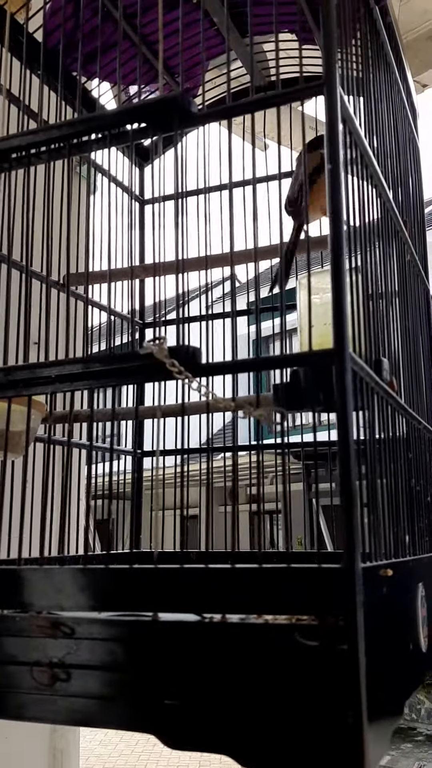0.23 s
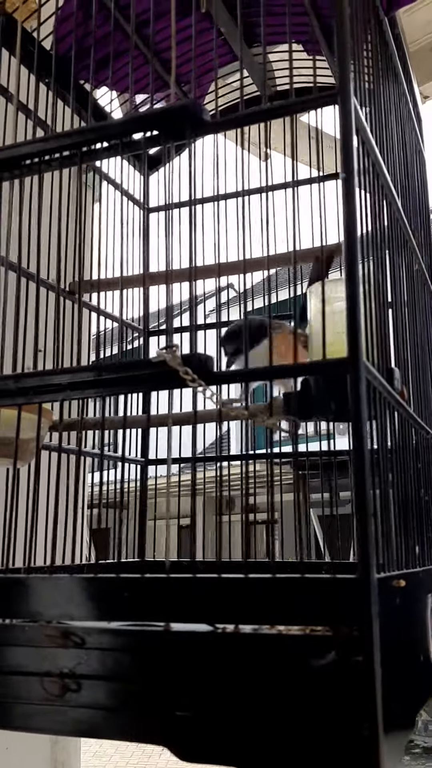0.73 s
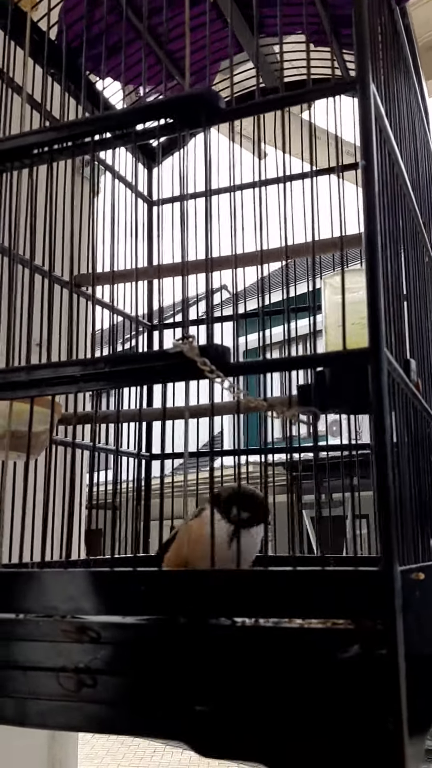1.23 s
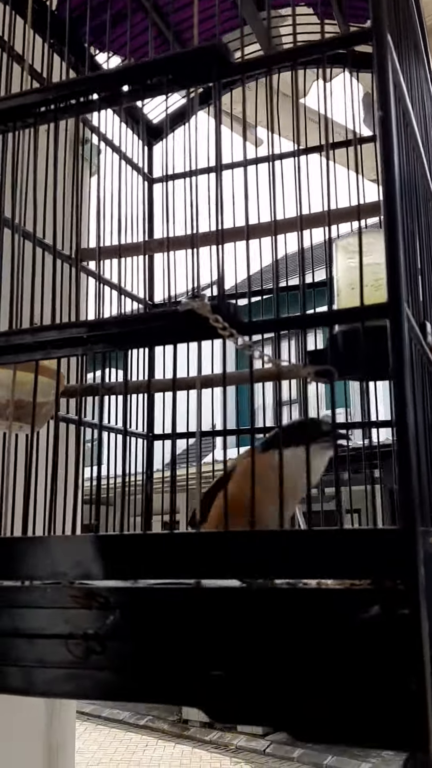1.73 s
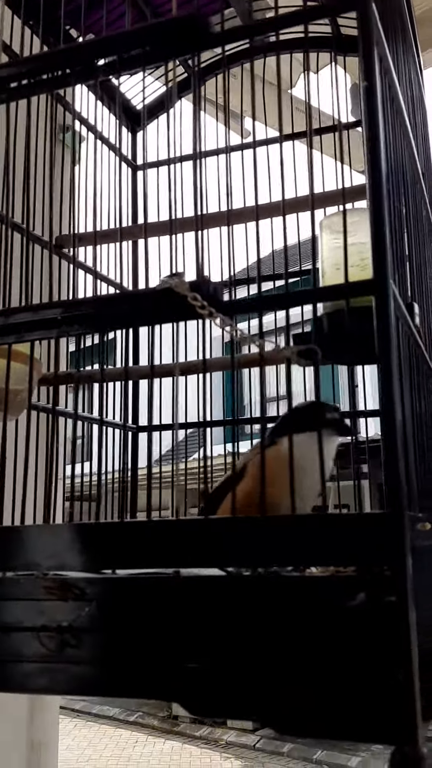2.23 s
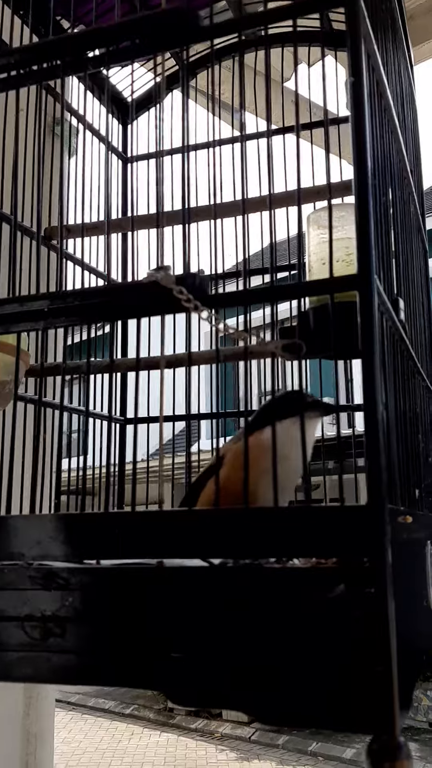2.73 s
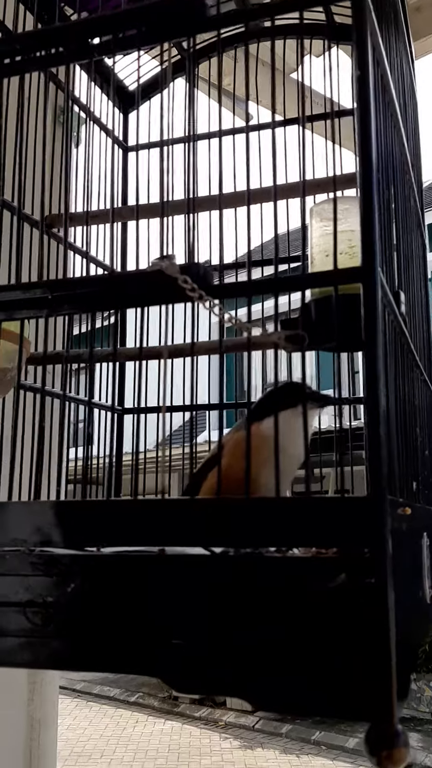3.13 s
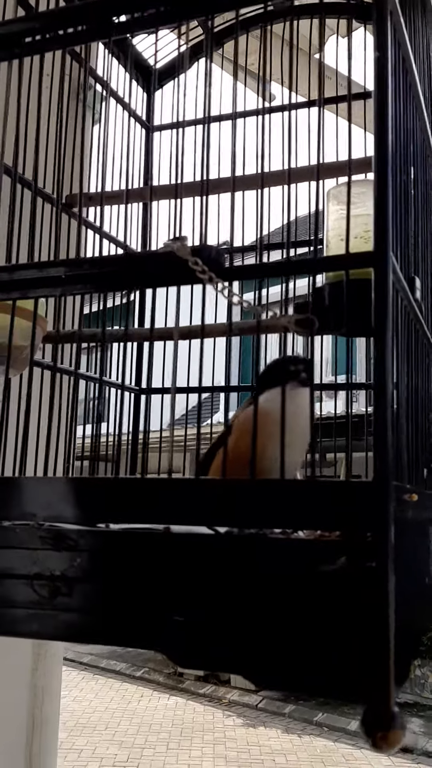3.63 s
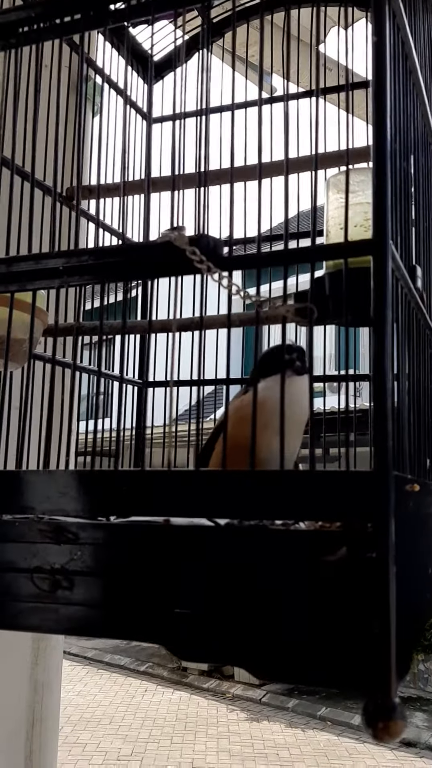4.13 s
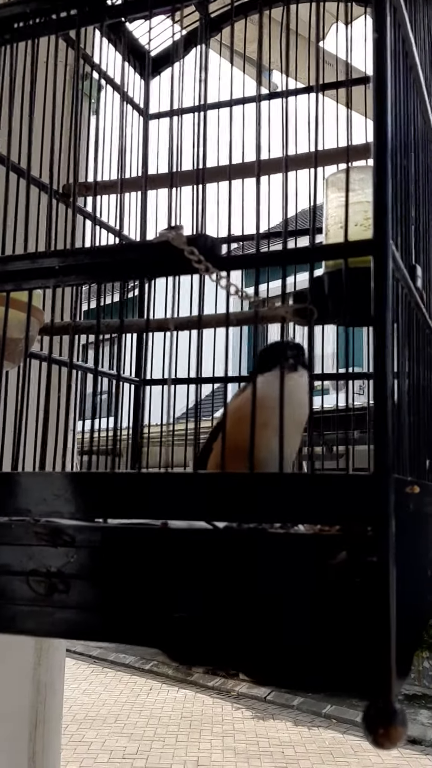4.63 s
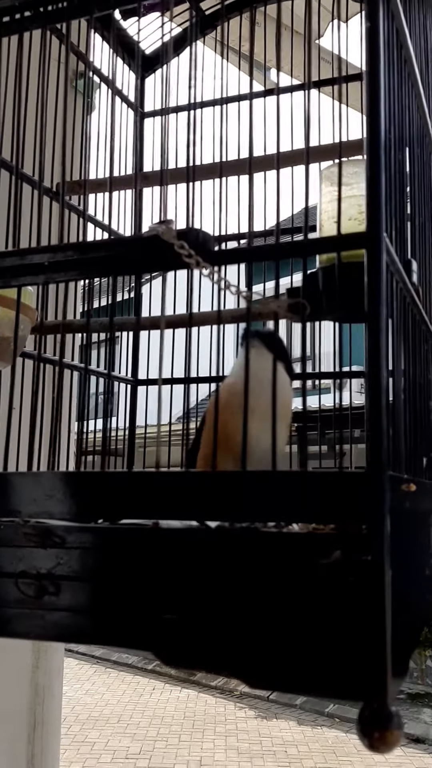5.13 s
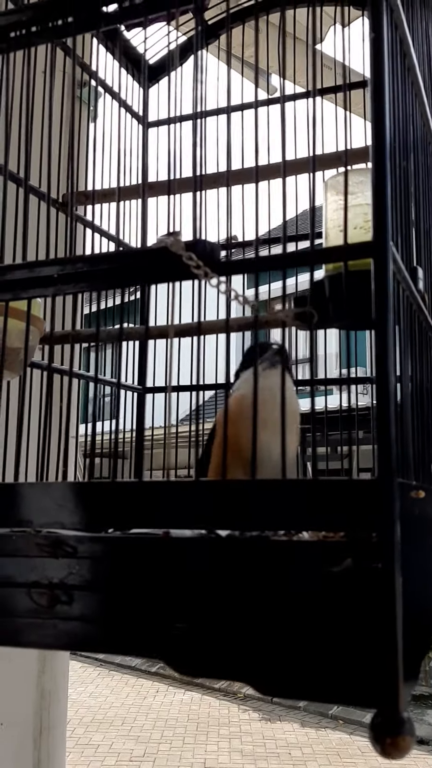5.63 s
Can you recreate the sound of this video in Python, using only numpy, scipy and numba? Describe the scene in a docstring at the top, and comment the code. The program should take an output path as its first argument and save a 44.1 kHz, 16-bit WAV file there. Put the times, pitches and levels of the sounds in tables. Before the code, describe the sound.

A caged bird flutters down with hoarse rasps, then gives evenly spaced sharp chips that turn into lower nasal yips in a ringing porch.

```python
"""Shrike in a porch cage

A shrike flutters down to the floor of a wire cage, with three hoarse rasps, a run of sharp chips, then nasal yips.
Each note is a stack of partials on one quick arch of pitch, shaped by throat and beak; the porch rings after it.
Wing strokes are puffs of low noise; claws are ringing knocks on the frame with noisy ticks on the wires.
A second bird twitters further off, over a noise bed of low town rumble and blurred birds and echoes above,
with a faint hum and one soft low note. All is heard through a phone with two ports and a limiter, held at the bars."""
import sys
import numpy as np
from scipy import signal
from scipy.fft import rfft, irfft
from scipy.io import wavfile
from scipy.ndimage import map_coordinates
from numba import njit

SR = 44100
rng = np.random.default_rng(int(sys.argv[2]) if len(sys.argv) > 2 else 0)


def wrap_up_sound(samples):
    """Save the sound to the file named by the first command line argument, as 16-bit audio."""
    columns = np.atleast_2d(samples).T
    # keep every value between -1 and 1, then stretch to whole-number steps
    tamed = np.clip(columns, -1, 1)
    steps = np.round(tamed * 32767).astype(np.int16)
    wavfile.write(sys.argv[1], SR, steps)


N = 259294  # length in samples

# Levels are mix settings ahead of resonance, reverberation and limiter.
# Hoarse calls: start_s, length_s, top_hz, level_db, beak_hz, brightness_db_per_octave
RASP_NOTES = [(.189, 0.055, 2140, -30, 3360, -4.5), (.938, .06, 2053, -26, 3330, 2.5),
              (1.529, .056, 2407, -23.5, 3520, -3)]
# Sharp falling chips: start_s, length_s, top_hz, level_db, beak_hz, beak_gain_db,
# brightness_db_per_octave, roughness (0 = clean)
CHIP_NOTES = [(1.2868, .021, 2306, -19.5, 4500, 4, -5.5, 0.17),
              (1.8033, .019, 2410, -20.5, 4100, 6.5, 4.5, 0.13),
              (2.0783, 0.018, 2443, -19.5, 4100, 7, 4.5, 0),
              (2.3957, 0.019, 2408, -21.5, 4480, 11.5, 3, 0.14),
              (2.7204, 0.018, 2412, -22.5, 4100, 11.5, 5, 0),
              (3.0205, 0.019, 2314, -22.5, 4400, 14, 4, 0.25),
              (3.3366, 0.021, 2416, -24, 4160, 12.5, 5.5, .1),
              (3.6262, .024, 2054, -23, 5070, 13.5, 7.5, 0.2)]
# Lower, nasal yips: start_s, length_s, top_hz, level_db, beak_hz, brightness_db_per_octave,
# start_pitch (share of the top)
YIP_NOTES = [(3.9138, 0.024, 1542, -25, 4580, 1, 0.88), (4.2372, 0.023, 1481, -27.5, 4540, 0.5, 0.8),
             (4.591, 0.027, 1509, -26.5, 4580, -1.5, 0.84), (4.8565, 0.038, 1609, -26, 4220, -1.5, .68),
             (5.1165, 0.035, 1627, -25, 3840, -8.5, .68), (5.4052, .034, 1513, -25.5, 4050, -2, .78),
             (5.6718, 0.03, 1434, -26, 4520, -1.5, 0.82)]
# Throat colour of both birds: partial_hz, gain_db
THROAT_COLOUR = [(1000, -5), (1400, -5.5), (1800, -1), (2300, -1), (3000, 3.5), (4000, 2.5), (5200, 2.5),
                 (6500, -2), (8300, -11), (9700, -8.5), (12000, -15), (16000, -25)]
# Shrike's place between the ports: time_s, left_minus_right_db
SHRIKE_PLACE = [(0, 2), (1.8, -3.5), (3.3, 1), (4.3, 1), (5.8, 0)]
# Claws on the cage: start_s, knock_db, wire_tick_db
CLAW_HITS = [(.768, -43, -48), (1.071, -49, -43), (1.089, -34.5, -42), (1.113, -32, -37), (1.22, -53, -44),
             (1.791, -35, -50)]
# Ringing modes of the cage frame: mode_hz, level_db, t60_s
CAGE_MODES = [(466, -21, 0.85), (564, -21, 0.075), (786, -4, 0.035), (933, -4.5, 0.017), (1143, -13, 0.12)]
# Flurries of wing strokes: start_s, length_s, first_stroke_db
WING_FLURRIES = [(.553, .17, -26.5), (.772, .12, -25), (1.155, .03, -38)]
WINGBEAT_HZ, STROKE_S, STROKE_FADE_DB_PER_S = 20.25, .048, 61
# Phase by which the left port leads: frequency_hz, lead_radians
PORT_LEAD = [(0, 0), (950, 1.1), (2070, -0.1), (2840, 2.0), (3530, 2.9), (3960, 5.5), (5770, 8.6),
             (7840, 7.7), (8790, 9.0), (11000, 9.9), (13000, 12.3), (14500, 10.6), (15300, 12.1),
             (16500, 12.5)]
# Strength at the two ports: frequency_hz, left_minus_right_db
PORT_LEVELS = [(1300, -.5), (2400, -1), (4400, -.3), (8000, -2.5), (15000, -3)]
# Porch reverberation by band: centre_hz, level_db, t60_s (before the tail is stretched)
PORCH_TAIL = [(1170, -5.5, 0.61), (2220, -9, 0.49), (3130, -11, 0.49), (4400, -9, 0.53), (7000, -9.5, .45),
              (9600, -14, 0.44), (14800, -7, 0.37)]
# Notes of the far bird; the first is the rough, fading tail of an earlier call: start_s, length_s,
# top_hz, level_db, brightness_db_per_octave, roughness (0 = clean), summit_place (share of the length)
TWITTER_CALLS = [(0, 0.014, 1870, -53.5, 4, 1.1, .1), (.513, 0.028, 2492, -54, 7.5, 0.54, .15),
                 (.55, 0.045, 2230, -49.5, 3.5, 0.53, 0.12), (.604, 0.039, 3664, -46, 1, 0.94, 0.86),
                 (3.838, 0.05, 2635, -54.5, 3, 1, .3), (3.88, 0.098, 3460, -48, 3.5, 0.73, 0.44),
                 (3.95, .086, 4390, -45.5, -3, 0.97, 0.3), (5.046, .036, 3100, -49, 2.5, 0.2, 0.5),
                 (5.1, 0.06, 4150, -43.5, 2, 0.56, 0.19), (5.145, .04, 3634, -39, -7, 0.18, .7)]
# Spectrum of the outdoor background, relative: frequency_hz, density_db (per Hz)
TOWN_SPECTRUM = [(15, -44), (25, 1.5), (137, 0), (489, -17.5), (1070, -21), (1520, -24.5), (1840, -23.5),
                 (3340, -28), (4370, -23), (5140, -25), (6920, -30), (8590, -41), (9320, -39.5),
                 (14000, -41), (16000, -63)]
# Swell of the background, eased off towards the treble: time_s, swell_db
TOWN_SWELL = [(0, 3), (.4, 4), (1.1, 6), (1.8, 3.5), (2.6, 1), (3.3, 0.5), (5.8, 0)]
TOWN_DB = -43  # rms over both sides
TOP_HZ = 15900  # upper edge of the phone's range


def shrike_song():
    """The shrike's rasps, chips and yips; the first chip comes before the last rasp."""
    return sing(RASP_NOTES, rasp) + sing(CHIP_NOTES, chip) + sing(YIP_NOTES, yip)


def rasp(length, top_hz, db, beak_hz, bright_db):
    """A hoarse swell up from a low growl, its roughness clearing as the note goes on."""
    return note(length, top_hz, db, beak_hz, bright_db, start=0.24, end=.6, summit=.48,
                attack=0.43, fading=0.29, beak_db=5.5, rough=0.82, clearing=1, half_db=-10,
                closing_db=23.5, crest_db=3.5, jitter=0.04, air=0.35)


def chip(length, top_hz, db, beak_hz, beak_db, bright_db, rough):
    """A note that starts near its top and drops by over an octave."""
    return note(length, top_hz, db, beak_hz, bright_db, start=0.94, end=0.46, summit=0.1687,
                attack=.26, fading=0.72, beak_db=beak_db, rough=rough, half_db=-9.5,
                closing_db=8.5, crest_db=4, fall=1.5, jitter=0.033, beak_width_hz=880)


def yip(length, top_hz, db, beak_hz, bright_db, start):
    """A shallow arch with an abrupt start, pushed hardest at its summit."""
    return note(length, top_hz, db, beak_hz, bright_db, start=start, end=.8, summit=.48,
                attack=0.12, fading=0.55, beak_db=12.5, rough=0.057, closing_db=25,
                crest_db=5.0, rise=1.094, fall=1.55, beak_width_hz=583)


def sing(notes, voice):
    """Place all the sounds of one kind on a track."""
    out = np.zeros(N)
    for start_s, *settings in notes:
        add(out, start_s, voice(*settings))
    return out


def note(length, top_hz, db, beak_hz, bright_db, rough, *, start, end, summit, attack, fading,
         beak_db, closing_db, crest_db, clearing=0, half_db=-np.inf,
         sheen_db=0, sheen_hz=11800, sheen_width_hz=800, rise=1.3, fall=1.3, beak_width_hz=778,
         closing_octaves=0.64, jitter=0.054, flutter=.45, air=0.49, crest_s=0.0051):
    """One arch of the syrinx: partials through throat and beak, whose resonance sinks as the beak closes."""
    # start and end are shares of the top pitch; summit, attack and fading are shares of the length
    t = np.arange(int(length * SR)) / SR
    done = t / length
    top_s = summit * length
    rough = rough * (1 - min(clearing, 1) * done)

    to_summit = np.clip(1 - t / top_s, 0, 1) ** rise
    past_summit = np.clip((t - top_s) / max(length - top_s, 1 / SR), 0, 1) ** fall
    hz = top_hz + (start - 1) * top_hz * to_summit + (end - 1) * top_hz * past_summit
    hz = hz * (1 + jitter * rough * walk(len(t), 690))  # the membranes swing unevenly
    orders = np.arange(1, 14.5, .5)[:, None]
    partials = orders * hz

    resonance_hz = beak_hz * 2 ** (closing_octaves * (.5 - done))
    colour_db = at_hz(partials, THROAT_COLOUR)
    colour_db += beak_db / (1 + ((partials - resonance_hz) / beak_width_hz) ** 2)
    tilt_db = bright_db + closing_db * (.5 - done)  # per octave, above the beak only
    colour_db += tilt_db * np.log2(np.maximum(partials / beak_hz, 1))
    # a thin, high resonance
    colour_db += sheen_db / (1 + ((partials - sheen_hz) / sheen_width_hz) ** 2)
    # strong and weak swings alternate: lines between the harmonics
    colour_db += np.where(orders % 1, half_db, 0)

    phase = 2 * np.pi * np.cumsum(partials, axis=1) / SR
    grit = np.array([walk(len(t), 1786) for _ in partials])  # air rasps on every partial
    waves = np.sin(phase) + air * rough * grit * np.cos(phase)
    tone = np.sum(undb(colour_db) * (partials < SR / 2.5) * waves, axis=0)

    pressure = np.sin(np.pi / 2 * np.clip(done / attack, 0, 1)) ** 2
    pressure *= np.clip((1 - done) / max(fading, 1 / len(t)), 0, 1) ** 0.63
    # the push peaks with the pitch
    pressure *= undb(crest_db * (np.exp(-((t - top_s) / crest_s) ** 2) - 0.4732))
    return undb(db) * tone * pressure * (1 + flutter * rough * walk(len(t), 538))


def claws():
    """Feet knock the frame into decaying modes and tick on the wires with brief noise."""
    out, t = np.zeros(N), np.arange(SR // 2) / SR
    frame = sum(undb(db - 60 * t / t60) * np.sin(2 * np.pi * hz * t) for hz, db, t60 in CAGE_MODES)
    for start_s, knock_db, tick_db in CLAW_HITS:
        tick = band(len(t), 8400, 13000) * np.exp(-t / 0.0023)
        add(out, start_s, undb(knock_db) * frame + undb(tick_db) * tick)
    return out


def wings():
    """Each stroke pushes a soft puff of air at the ports; the strokes of a flurry grow weaker."""
    out, t = np.zeros(N), np.arange(SR // 4) / SR
    push = np.sin(np.pi * np.minimum(t / STROKE_S, 1)) ** .5 * (t < STROKE_S)
    for start_s, length_s, db in WING_FLURRIES:
        for since in np.arange(0, length_s, 1 / WINGBEAT_HZ):
            puff = band(len(t), 85, 45) + undb(-6.5) * band(len(t), 153, 117)
            add(out, start_s + since, undb(db - STROKE_FADE_DB_PER_S * since) * puff * push)
    return out


def ports(x):
    """Direct sound reaches the two ports with different phase and strength."""
    f = bins(N)
    lead = np.exp(.5j * np.interp(f, *np.transpose(PORT_LEAD)))
    turn = lead * undb(at_hz(f, PORT_LEVELS) / 2)
    return irfft(rfft(x) * np.array([turn, 1 / turn]), N)


def porch(x, near_db, near_s, tail_db, stretch):
    """Quick scatter from cage and roof, then a diffuse tail that dies soonest in the top treble."""
    t, f = np.arange(SR) / SR, bins(SR)
    noise, tail = rfft(rng.standard_normal((2, SR))), 0
    centres = np.array(PORCH_TAIL)[:, 0]
    # each share is 1 at its own band and 0 at the others, so neighbours cross-fade
    for share, (_, db, t60) in zip(np.eye(len(centres)), PORCH_TAIL):
        fade = undb(-60 * t / (t60 * stretch)) * np.clip(t / .012, 0, 1)
        strand = irfft(noise * at_hz(f, np.c_[centres, share]))
        tail = tail + undb(db) * fade / np.linalg.norm(fade) * strand
    scatter = rng.standard_normal((2, SR)) ** 3 * np.exp(-t / near_s) * (t > .002)  # cubing makes it sparse
    scatter /= np.linalg.norm(scatter, axis=1, keepdims=True)
    response = undb(near_db) * scatter + undb(tail_db) * tail
    return signal.fftconvolve(x[None], response, axes=1)[:, :N]


def twitter(length, top_hz, db, bright_db, rough, summit, slide=0.23):
    """A high, breathy sound of the far bird, sliding up and down at the same average rate."""
    return note(length, top_hz, db, 4460, bright_db, start=1 - slide * summit,
                end=1 - slide * (1 - summit), summit=summit, attack=0.095, fading=0.64,
                beak_db=8, rough=rough, closing_db=-5.5, crest_db=4.5, sheen_db=8.5)


def town(flicker_db=2.0, likeness=0.78, left_db=-3, low_hz=42):
    """Outdoor background: low rumble, blurred bird calls and lingering echoes above; noise bands flicker alone."""
    f, out = bins(N), 0
    # the bass swells most and is more alike left and right
    swell_db = np.interp(np.arange(N) / SR, *np.transpose(TOWN_SWELL))
    alike = np.clip(likeness, 0, 1) / (1 + f / 1500)
    colour = undb(at_hz(f, TOWN_SPECTRUM)) * f ** 4 / (f ** 4 + low_hz ** 4)
    mid, side = rfft(rng.standard_normal((2, N))) * colour * np.sqrt([1 + alike, 1 - alike])
    pair = np.array([(mid + side) * undb(left_db / (1 + f / 600)), mid - side])
    centres = 25 * 2 ** (np.arange(20) / 2)  # half an octave apart
    for hz, share in zip(centres, np.eye(len(centres))):
        strand = irfft(pair * at_hz(f, np.c_[centres, share]), N)
        out = out + strand * undb(swell_db / (1 + hz / 1500) + flicker_db * walk(N, 12))
    return undb(TOWN_DB) * unit(out)


def hum(hz=463, width_hz=5, db=-67):
    """A faint, wavering hum in the distance, made of very narrow noise."""
    return undb(db) * band(N, hz, width_hz)


def low_swell(s=2.54, width_s=0.06, hz=320, width_hz=45, db=-50):
    """A soft, low note of narrow noise swells briefly somewhere outside."""
    return undb(db) * band(N, hz, width_hz) * np.exp(-((np.arange(N) / SR - s) / width_s) ** 2)


def undb(db):
    """Turn decibels into an amplitude factor."""
    return 10 ** (np.asarray(db) / 20)


def unit(x):
    """Scale to rms 1."""
    return x / np.sqrt(np.mean(x ** 2))


def at_hz(hz, points):
    """Read (Hz, value) points on a log-frequency axis."""
    f, value = np.transpose(points)
    return np.interp(np.log(np.maximum(hz, 1)), np.log(np.maximum(f, 1)), value)


def bins(n):
    """Frequencies in Hz of the spectrum of n samples."""
    return np.arange(n // 2 + 1) * SR / n


def band(n, hz, width_hz):
    """Noise in one bell-shaped band, rms 1."""
    bell = np.exp(-((bins(n) - hz) / width_hz) ** 2)
    return unit(irfft(rfft(rng.standard_normal(n)) * bell, n))


def walk(n, rate):
    """A smooth random wander with spread near 1, given its random points per second."""
    steps = np.arange(n) * rate / SR
    points = rng.standard_normal(int(steps[-1]) + 2)
    return map_coordinates(points, [steps], order=3, mode="nearest")


def add(track, s, sound):
    """Mix a sound in at a time in seconds."""
    i = max(int(s * SR), 0)
    track[i:i + len(sound)] += sound[:len(track) - i]


@njit
def follow(size, attack, release):
    """Level envelope with its own rates for rising and falling."""
    out, e = np.empty(len(size)), 0.
    for i in range(len(size)):
        e += (size[i] - e) * (attack if size[i] > e else release)
        out[i] = e
    return out


def scene():
    """The shrike close by, the far bird mostly as reverberation, wing draught and outdoor background."""
    shrike, far, cage = shrike_song(), sing(TWITTER_CALLS, twitter), claws()
    pan_db = np.interp(np.arange(N) / SR, *np.transpose(SHRIKE_PLACE))
    direct = ports(shrike) * undb(np.array([pan_db, -pan_db]) / 2) + cage
    near = direct + porch(shrike + cage, near_db=-4.0, near_s=0.008, tail_db=-0.5, stretch=0.87)
    far_porch = porch(far, near_db=4.0, near_s=0.0063, tail_db=19.5, stretch=1.86)
    distant = undb(-4.5) * far + far_porch
    # the wing draught strikes the right port harder, and partly on its own
    draught = np.array([undb(-13) * wings(), undb(3) * wings()]) + undb(-6.5) * wings()
    return near + distant + draught + town() + hum() + low_swell()


def record(dry, threshold_db=-8, ratio=3, attack_s=0.0022, release_s=0.0012):
    """The phone's limiter holds down whatever passes its threshold, both sides together; the top is cut."""
    envelope = follow(np.abs(dry).max(axis=0), 1 / (attack_s * SR), 1 / (release_s * SR))
    gain = np.maximum(envelope / undb(threshold_db), 1) ** (1 / ratio - 1)
    top_cut = signal.ellip(8, .2, 70, TOP_HZ, fs=SR, output="sos")
    return signal.sosfilt(top_cut, dry * gain)


dry = scene()
out = record(dry)
wrap_up_sound(out)
```